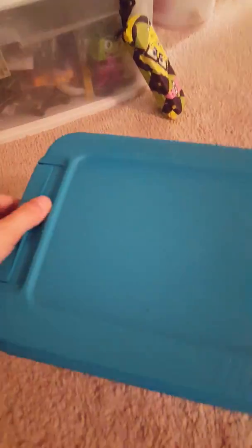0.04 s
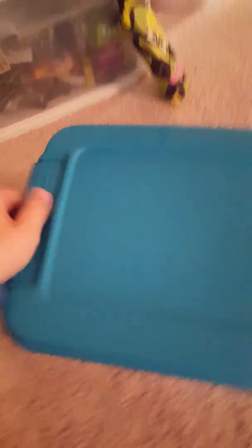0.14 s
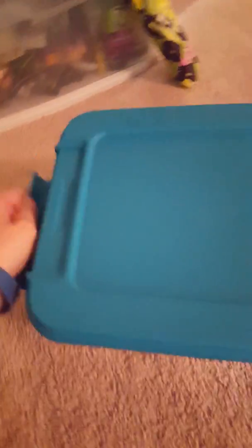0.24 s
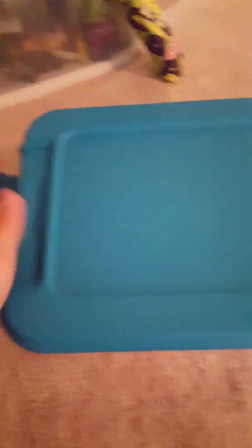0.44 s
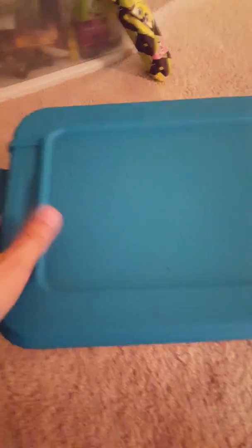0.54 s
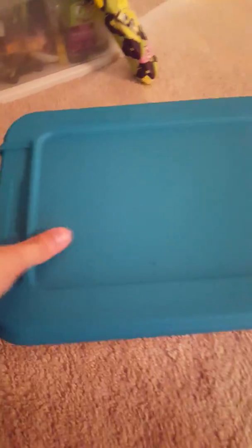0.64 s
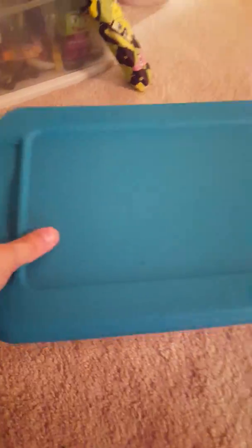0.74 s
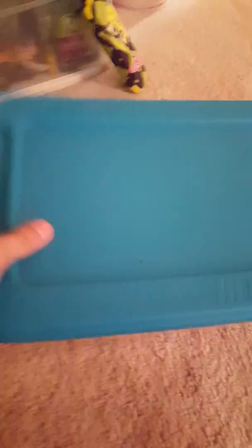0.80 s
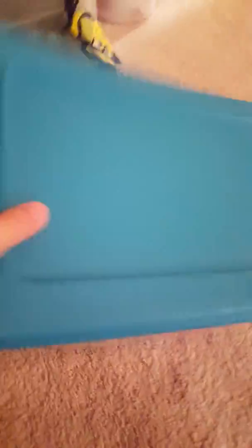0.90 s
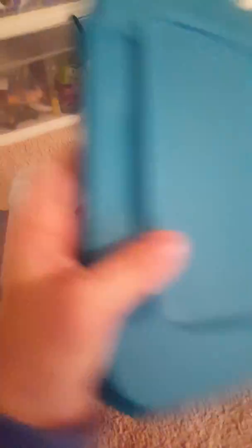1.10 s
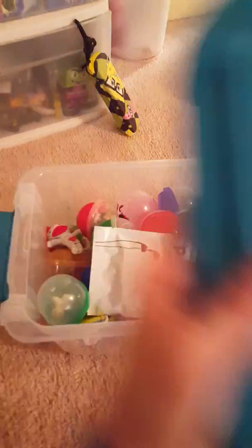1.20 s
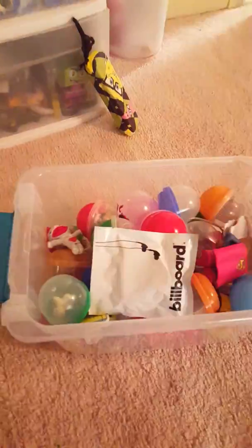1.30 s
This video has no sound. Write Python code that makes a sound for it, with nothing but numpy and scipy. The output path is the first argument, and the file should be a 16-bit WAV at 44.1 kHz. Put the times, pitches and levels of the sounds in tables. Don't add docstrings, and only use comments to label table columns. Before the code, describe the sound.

A plastic storage bin lid unsnaps with sharp clicks and hollow knocks, then lifts off indoors.

```python
import sys
import numpy as np
from scipy import signal
from scipy.io import wavfile
from scipy.ndimage import uniform_filter1d

SR = 44100
rng = np.random.default_rng(int(sys.argv[2]) if len(sys.argv) > 2 else 0)


def nominal_scale(level):
    x = np.asarray(level, float) / 20
    return 10 ** x


def persist_wave(psi):
    counts = np.round(np.clip(psi, -1, 1) * 32767).astype(np.int16)
    wavfile.write(sys.argv[1], SR, np.atleast_2d(counts).T)


N = 59535
T = np.arange(N) / SR
SIDES = np.array([[1], [-1]])
PORTS_HZ, PORT_TURN_RAD = 460, 1.84
PUSH_TURNS = 0.46


def level(x, db):
    return x * nominal_scale(db) / np.sqrt(np.mean(x ** 2))


def pan(left_right_db):
    return nominal_scale(left_right_db * SIDES / 2)


def lowpass(x, order, hz):
    return signal.lfilter(*signal.butter(order, hz, fs=SR), x)


def highpass(x, order, hz):
    return signal.lfilter(*signal.butter(order, hz, "high", fs=SR), x)


def band(x, hz, width_hz):
    return signal.lfilter(*signal.iirpeak(min(hz, 0.4 * SR), hz / width_hz, SR), x)


def decay(t, t60_s):
    return np.exp(-np.log(1000) * t / t60_s)


def ring(x, hz, db, t60_s, turn):
    pole = np.exp(2j * np.pi * hz / SR - np.log(1000) / (max(t60_s, 0.003) * SR))
    z = signal.lfilter([1], [1, -pole], x)
    turn_rad = turn * PORT_TURN_RAD / (1 + (PORTS_HZ / hz) ** 3)
    left = (z * np.exp(0.5j * turn_rad)).imag
    right = (z * np.exp(-0.5j * turn_rad)).imag
    return nominal_scale(db) * np.array([left, right])


def soft_push(t, hz):
    return np.sin(np.pi * np.clip(t * hz / PUSH_TURNS, 0, 1)) ** 2


def add(out, at_s, x):
    i = max(int(at_s * SR), 0)
    out[:, i:i + x.shape[1]] += x[:, :N - i]


def walk(rate_hz):
    x = signal.lfilter([1], [1, -np.exp(-2 * np.pi * rate_hz / SR)], rng.standard_normal(N))
    x = uniform_filter1d(x, int(SR / rate_hz / 4))
    return (x - x.mean()) / x.std()


# pitch_hz [Hz], level_db [dB]
HUM = [(59, -53.5), (83, -57)]


def hum():
    out = 0
    for pitch_hz, level_db in HUM:
        turns = pitch_hz * T + rng.random() + 0.099 * walk(4.9) + 0.009 * SIDES
        out = out + level(np.sin(2 * np.pi * turns), level_db) * nominal_scale(walk(1))
    return out * pan(3.2)


# freq_hz [Hz], density_db [dB per Hz]
AIR = [(18, -29), (30, -2.5), (239, -10.5), (702, -17), (1160, -66), (1280, -29.5), (2680, -30),
       (3220, -52), (16000, -40.5)]
AIR_DB = -54


def air():
    out = 0
    freq_hz, density_db = np.array(AIR).T
    for hz in 30 * 2 ** np.arange(0, 9.1, 0.5):
        mid, side = band(band(rng.standard_normal((2, N)), hz, hz / 2.86), hz, hz)
        band_db = np.interp(np.log(hz), np.log(freq_hz), density_db) + 1.46 * walk(3.8)
        out = out + nominal_scale(band_db) * (mid + np.clip(hz / 900, 0.6, 1) * side * SIDES)
    return level(out, AIR_DB)


# start_s [s], length_s [s], level_db [dB], centre_hz [Hz]
SLIDES = [(0, 0.023, -55.5, 4350), (0, 0.018, -58, 9400), (0.081, .025, -67.5, 9700),
          (0.227, .13, -59, 10300), (0.414, 0.053, -58.5, 11900), (0.564, 0.033, -60.5, 11500),
          (0.652, 0.034, -69, 10200), (1.007, 0.053, -55, 12200), (0.991, 0.13, -59, 4800),
          (1.26, 0.055, -67.5, 11100), (1.316, 0.021, -60, 4540)]
SLIDE_EDGE_S, SLIDE_WIDTH = 0.01, 0.45


def slides():
    out = np.zeros((2, N))
    for start_s, length_s, level_db, centre_hz in SLIDES:
        rise = T - start_s + SLIDE_EDGE_S
        fall = (start_s + length_s - T) / 3 + SLIDE_EDGE_S
        shape = np.clip(np.minimum(rise, fall) / SLIDE_EDGE_S, 0, 1)
        hiss = band(rng.standard_normal((2, N)), centre_hz, centre_hz * SLIDE_WIDTH)
        hiss = band(hiss, centre_hz, centre_hz)
        out += level(hiss, level_db) * shape * nominal_scale(2.0 * walk(60))
    return out


# time_s [s], level_db [dB]
DRAG = [(0,-54.5),(.045,-58.5),(.07,-66.5),(.22,-67),(.25,-42),(.34,-49.5),(.39,-56),(.43,-52),(.5,-53.5),(.55,-55.5),(.6,-62),(.68,-65.5),
        (.73,-68),(.9,-79),(.99,-57.5),(1.12,-57),(1.2,-64.5),(1.35,-59.5)]
DRAG_PER_S, DRAG_SPREAD_DB, DRAG_DB = 1500, 3, 4
DRAG_RIM_DB, DRAG_PANEL_DB = -24.5, -18


def drag():
    grains = (rng.random(N) < DRAG_PER_S / SR) * np.sign(rng.standard_normal(N))
    grains = grains * nominal_scale(DRAG_SPREAD_DB * rng.exponential(size=N))
    grains = grains / grains.std() + 0.5 * rng.standard_normal(N)
    grains = grains * nominal_scale(np.interp(T, *np.array(DRAG).T) + DRAG_DB + 2.0 * walk(9.6))
    rim = sum(ring(grains, hz, db, 0.37 * t60_s, rng.standard_normal()) for hz, db, t60_s in RIM)
    panel = sum(ring(grains, hz, db, t60_s, rng.standard_normal()) for hz, db, t60_s in PANEL)
    return rim * nominal_scale(DRAG_RIM_DB) + panel * nominal_scale(DRAG_PANEL_DB)


# pitch_hz [Hz], level_db [dB], t60_s [s]
PANEL = [(106.6, -16, 0.11), (189.6, -16.5, 0.1), (250, -10.5, 0.094), (345, -8, 0.062), (450, -10, 0.05),
         (564, -8.5, 0.036)]
# start_s [s], level_db [dB], pitch_hz [Hz], t60_s [s]
KNOCKS = [(0.161,-39,212,0.11),(.234,-18,320,0.072),(0.2421,-19.5,250,0.056),(0.279,-20,219,0.032),(.291,-17,270,0.032),(.311,-21,201,0.1),
          (0.3202,-22.5,339,0.17),(1.0664,-22.5,305,0.036),(.341,-22.5,345,0.021),(0.4016,-24.5,292,0.073),(0.415,-25.5,323,0.065),(.424,-26,295,0.087),
          (0.4339,-26,183.8,0.22),(0.449,-22,236,0.028),(.473,-19,283,0.1),(.478,-9.5,259,0.035),(.495,-26.5,359,0.092),(0.506,-19.5,199,0.069),
          (0.523,-25.5,167,0.072),(.557,-24.5,173,0.078),(.571,-27,207,0.12),(.689,-34,218,0.025),(0.769,-26,276,0.015),(0.788,-31,185,0.065),
          (0.661,-41,362,0.18),(.989,-29,345,0.14),(1.056,-19,335,0.049),(1.0625,-20,112.5,0.056),(1.132,-38,331,0.23),(1.189,-43.5,345,0.12)]
MODE_SCATTER_DB, KNOCK_DB = 1.5, 0.5


def knocks():
    out, t = np.zeros((2, N)), T[:5000]
    for start_s, level_db, pitch_hz, t60_s in KNOCKS:
        push = soft_push(t, pitch_hz)
        x = ring(push, pitch_hz, 0, t60_s, rng.standard_normal())
        for mode_hz, mode_db, mode_t60_s in PANEL:
            detune, scatter, turn = rng.standard_normal(3)
            x = x + ring(push, mode_hz * (1 + 0.064 * detune), mode_db + MODE_SCATTER_DB * scatter,
                         mode_t60_s, turn)
        x = highpass(x, 2, pitch_hz / 2)
        add(out, start_s, x * nominal_scale(level_db + KNOCK_DB) / push.sum())
    return out


# start_s [s], pitch_hz [Hz], level_db
# [dB], t60_s [s]
PINGS = [(.2333,563,-16,0.018),(.2338,2240,-22.5,0.008),(.234,3540,-43,0.012),(.2342,4320,-22,0.0078),(.244,3500,-52,.015),
         (.2735,2420,-19.5,.009),(.2762,840,-17,0.026),(.2765,1600,-18,0.013),(.277,2900,-23,.008),(.274,6630,-27,0.0085),
         (.320,1640,-22.5,0.0053),(.328,1950,-24.5,0.0062),(.401,1190,-36,0.01),(.424,2800,-38,0.014),
         (.4732,630,-15.5,0.0084),(.4782,1036,-16.5,0.011),(.4777,1600,-26,0.005),(.4785,2000,-23.5,0.01),(.503,3060,-58,0.0088),(.506,945,-25,0.03),
         (.5215,2800,-30.5,0.013),(.523,493,-23,0.038),(.549,1650,-31.5,0.015),(.5712,1160,-23,0.0096),(.571,2030,-34,0.014),(.5715,2760,-31,0.014),
         (.769,1880,-35,0.0048),(.7808,2840,-37,.005),(.7808,4140,-54,.005),(.781,6560,-53,0.0058),(.7812,390,-20,0.013),
         (.9175,666,-34.5,0.021),(.9175,1530,-44,0.019),(.9185,2050,-48,0.019),(.921,292,-33.5,0.02),
         (.9612,1550,-35,0.012),(.9618,2030,-31,0.0052),(.9612,2560,-28,0.0075),(.9616,3150,-33,.006),
         (.989,608,-25,0.044),(.989,1494,-34,0.033),(.989,4830,-34,0.0055),(1.003,230,-27.5,0.022),
         (1.055,813,-22.5,0.036),(1.055,3500,-29.5,0.0095),(1.0555,4280,-32,0.01),(1.1032,580,-32.5,0.0077),
         (1.129,1830,-38,0.011),(1.13,3160,-38.5,0.017),(1.214,1940,-46,0.016)]
PING_TURN = 0.84


def pings():
    out, t, snap = np.zeros((2, N)), T[:3000], np.array(list(SNAPS) + list(TICKS))
    for k, (start_s, pitch_hz, level_db, t60_s) in enumerate(PINGS):
        push = soft_push(t, pitch_hz)
        pan_db = snap[np.argmin(np.abs(snap[:, 0] - start_s)), 4]
        turn = PING_TURN * np.sign(pan_db + 0.1)
        x = ring((-1) ** k * push / push.sum(), pitch_hz, level_db, t60_s, turn)
        add(out, start_s, x * pan(pan_db))
    return out


# pitch_hz [Hz], level_db [dB], t60_s [s]
RIM = [(695,-2,0.048),(890,-1.5,0.037),(1077,10,0.0093),(1300,-36,0.0025),(1600,-1,0.0081),(1909,4.5,0.0064),(2250,-7,0.0035),
       (2465,-2,0.004),(3217,-7,0.0086),(4380,-3,0.0042)]
# [dB, left over right]
SNAPS = [(.2325,-20.5,-25,9.6,2),(.273,-23,-14,3,5),(0.2758,-20.5,-27.5,7.3,9.5),(.320,-26.5,-34,2.5,0),(.328,-38,-33,2,12.5),
         (.341,-30.5,-36,0.88,-3),(0.4009,-27,-54,1.34,0.5),(0.4233,-24.5,-22,1.6,-3.5),(.473,-25.5,-33,0.76,12.5),(.478,-19.5,-20.5,3.64,-1.5),
         (0.5227,-29,-32,0.46,-1),(.549,-33,-25.5,3.7,0),(.570,-30.5,-37,7.3,-0.5),(.769,-40.5,-40,7.2,1),(0.7801,-34.5,-26,2.5,-2),
         (0.9179,-40,-32,8.8,2.5),(0.9608,-33,-41,5.9,-1.5),(.989,-28.5,-19.5,4.4,0.5),(1.055,-17,-18.5,1.26,6),(1.1032,-33,-10.5,0.93,1.5),
         (1.128,-38.5,-19,8.4,1),(1.1879,-40.5,-19,1.5,11)]
# [dB, left over right]
TICKS = [(0.099,-50.5,-16,16,4.5),(.412,-49,0.5,1.5,8),(0.441,-39.5,-28,3.4,-16),(.503,-28.5,-22,1.2,7),
         (1.007,-36,-23,1.9,7.5),(1.064,-32.5,-28,1.2,-11),(1.155,-44,-14.5,1.36,8),(1.214,-49.5,-17,3.9,-1),(1.265,-45,-10,3.1,0)]
SPOT_HZ = [3600,1810,2130,1760,1970,1210,1760,2800,1180,1300,2310,1890,2300,1600,2600,1260,2700,2400,1460,1960,2200,1480,
           2060,2970,2500,2300,1150,1750,3030,1600,1390]
SPOT_FALL_DB = 1.5
SNAP_RISE_S, CLICKS_PER_S = 0.00066, 7700
SNAP_DB, TREBLE_DB, TAIL_DB, TAIL_T60_S = 2.5, 12, -12.5, 0.058


def snaps():
    out, t = np.zeros((2, N)), T[:2500]
    for (start_s, level_db, treble_db, length_ms, pan_db), centre_hz in zip(list(SNAPS) + list(TICKS), SPOT_HZ):
        fade = np.exp(-t / (max(length_ms, 0.3) / 1000) * 2) * (1 - np.exp(-t / SNAP_RISE_S))
        chance, size = rng.random((2, len(t)))
        clicks = (chance < CLICKS_PER_S / SR) * (2 * size - 1) * fade
        clicks[8] = 2 / max(length_ms, 1)
        body = 0
        for mode_hz, mode_db, t60_s in RIM:
            detune, scatter, turn = rng.standard_normal(3)
            spot_db = -SPOT_FALL_DB * np.log2(mode_hz / centre_hz) ** 2
            body = body + ring(clicks, mode_hz * (1 + 0.028 * detune),
                               mode_db + MODE_SCATTER_DB * scatter + spot_db, t60_s, turn)
        body = highpass(lowpass(body, 4, 2 * centre_hz), 2, 0.34 * centre_hz)
        body /= np.abs(body).max()
        hiss = rng.standard_normal((3, 2, len(t)))
        crack = band(band(hiss[0], 5600, 3700), 4400, 5300) + 1.16 * band(hiss[1], 10900, 3500)
        crack = crack * fade * nominal_scale(treble_db + TREBLE_DB)
        tail = band(hiss[2], 2730, 1110) * decay(t, TAIL_T60_S) * nominal_scale(TAIL_DB)
        add(out, start_s, (body + tail + crack) * nominal_scale(level_db + SNAP_DB) * pan(pan_db))
    return out


ROOM_T60_S, ROOM_DB, ROOM_TOP_HZ = 0.35, -15, 2200


def room(lid):
    t = T[:12000]
    mid, side = rng.standard_normal((2, len(t))) * decay(t, ROOM_T60_S) * (t > 0.004)
    echo = mid + highpass(side, 2, PORTS_HZ) * SIDES
    echo = level(lowpass(echo, 1, ROOM_TOP_HZ), ROOM_DB) / np.sqrt(len(t))
    return signal.fftconvolve(lid.mean(0, keepdims=True), echo, axes=1)[:, :N]


LID_LOW_HZ, LEFT_DB = 109, 0.98


def scene():
    background = air() + hum()
    lid = highpass(slides() + drag() + knocks() + pings() + snaps(), 4, LID_LOW_HZ)
    return (lid + room(lid)) * pan(LEFT_DB) + background


def band_limit(x):
    return signal.sosfilt(signal.butter(12, 16540, fs=SR, output="sos"), x)


def record(dry):
    mix = highpass(dry, 2, 45)
    mix = signal.lfilter(*signal.cheby1(6, 1, 15200, fs=SR), mix)
    return band_limit(mix)


dry = scene()
out = record(dry)
persist_wave(out)
```